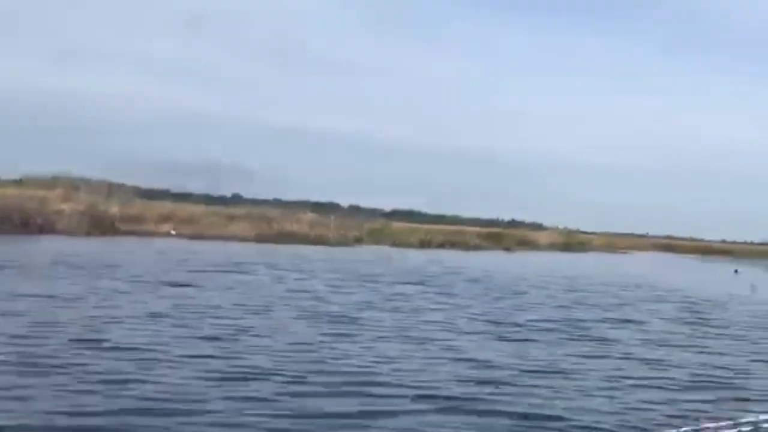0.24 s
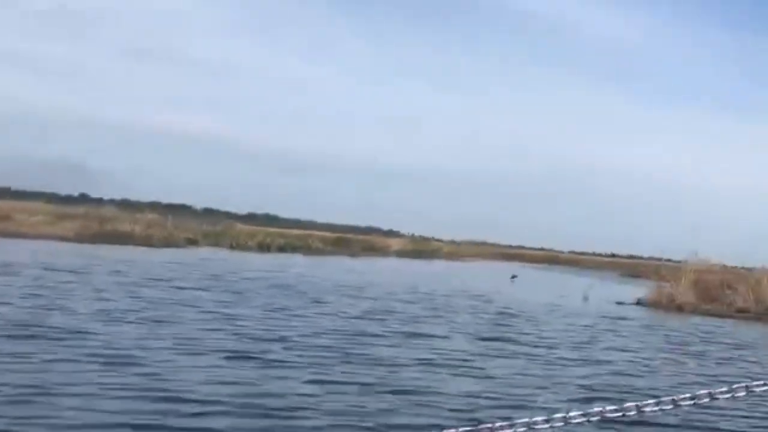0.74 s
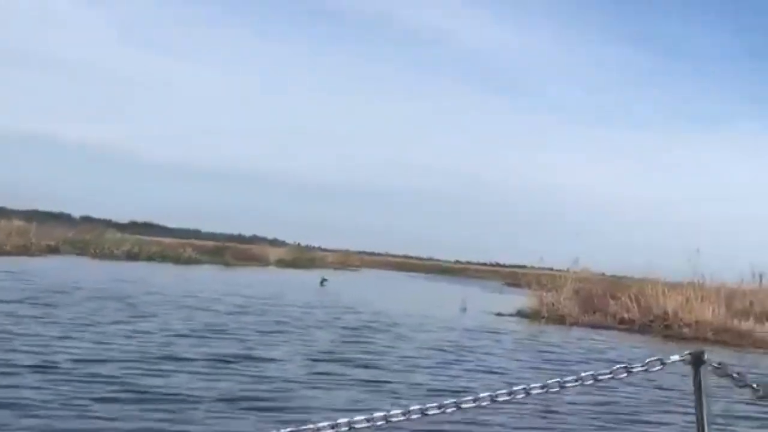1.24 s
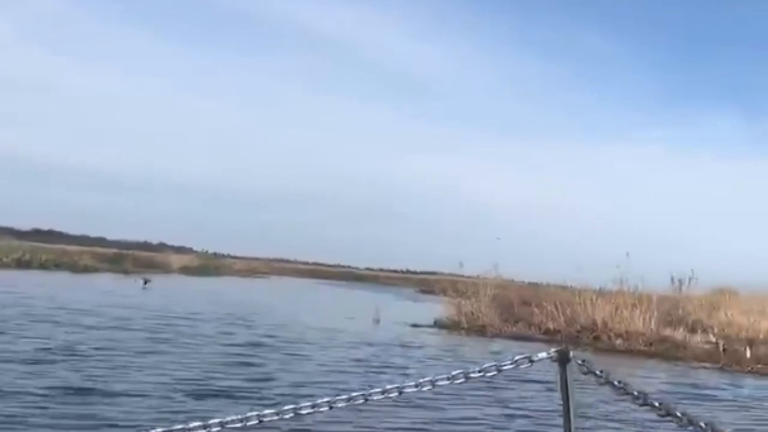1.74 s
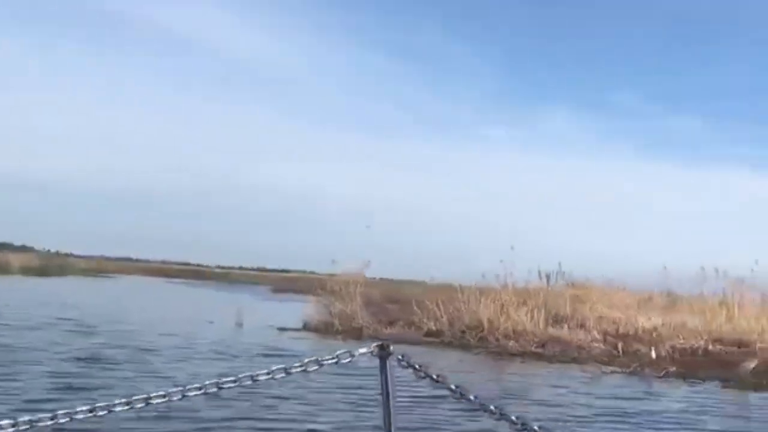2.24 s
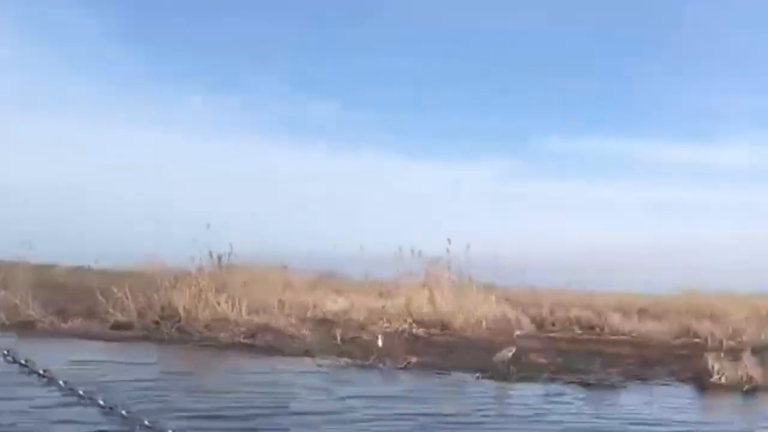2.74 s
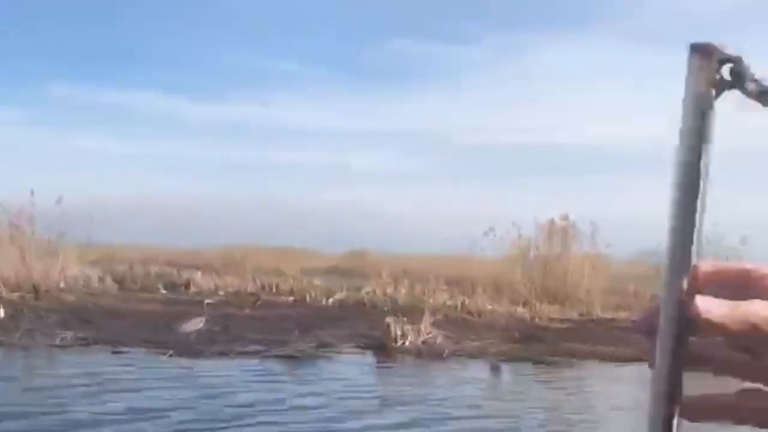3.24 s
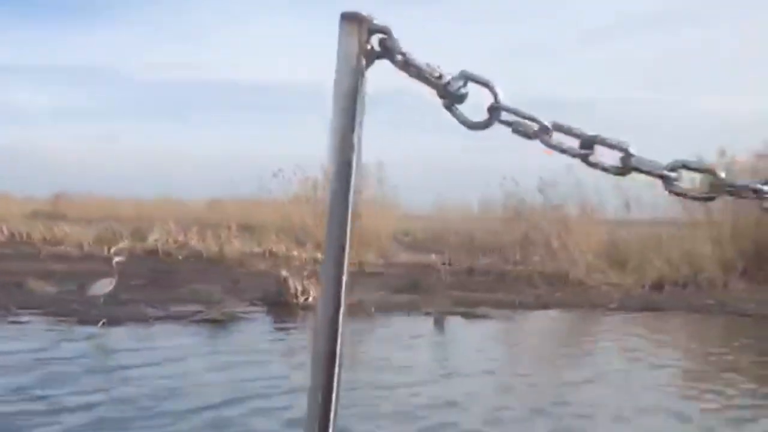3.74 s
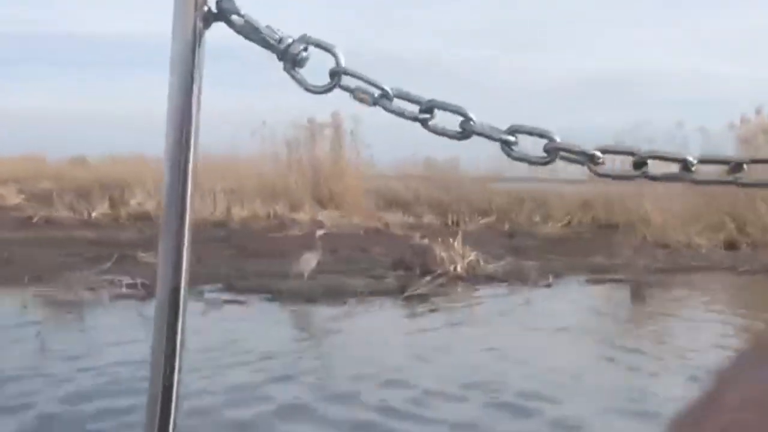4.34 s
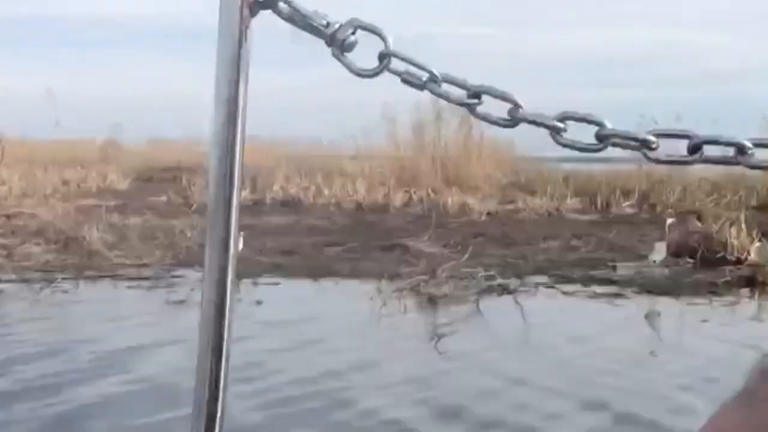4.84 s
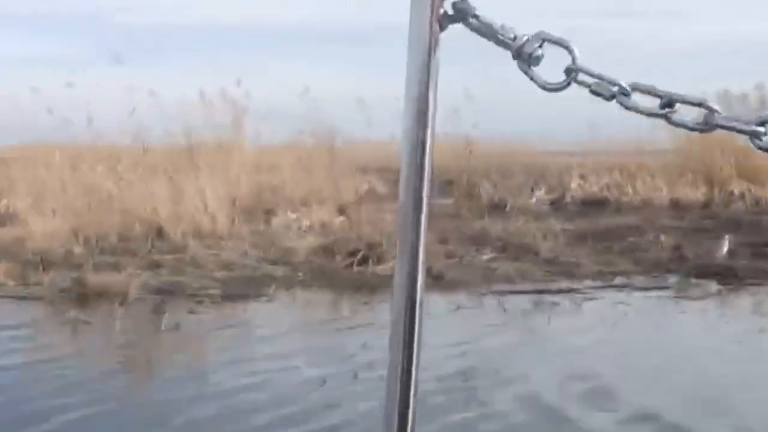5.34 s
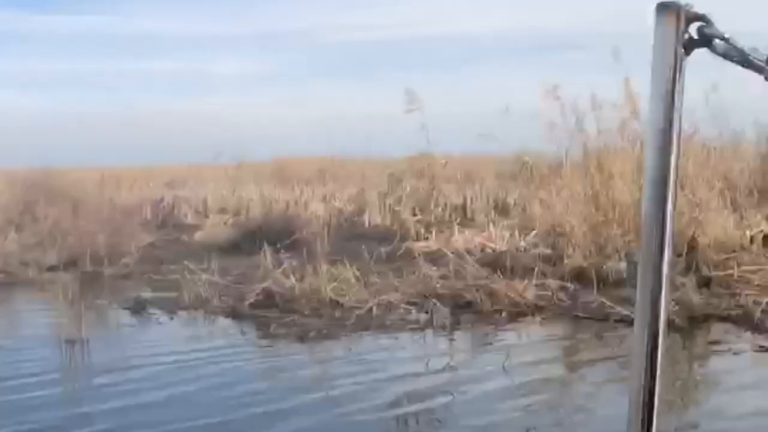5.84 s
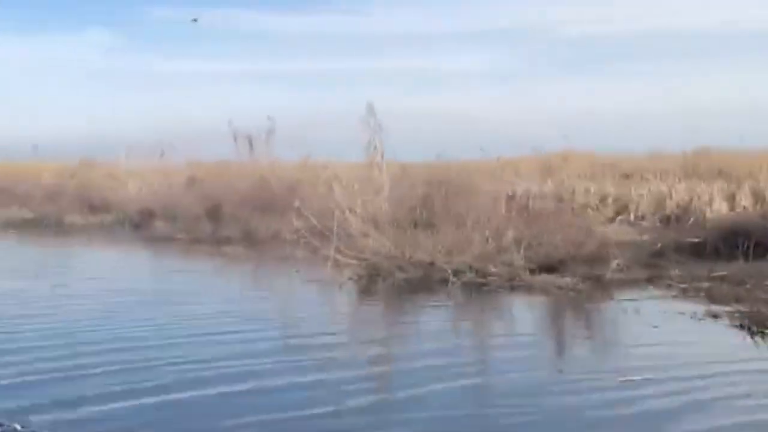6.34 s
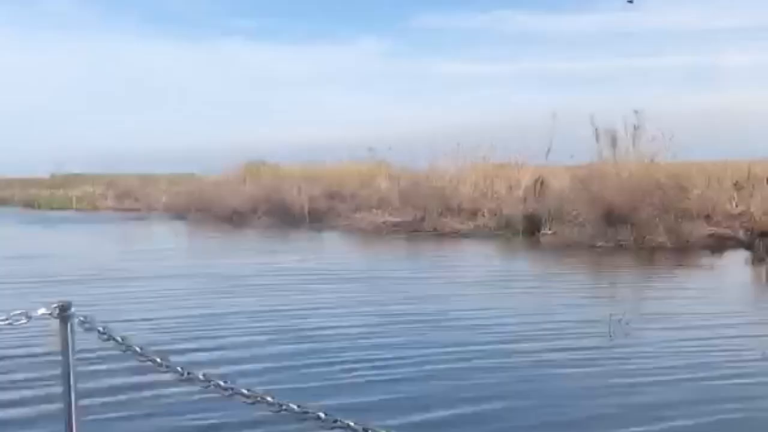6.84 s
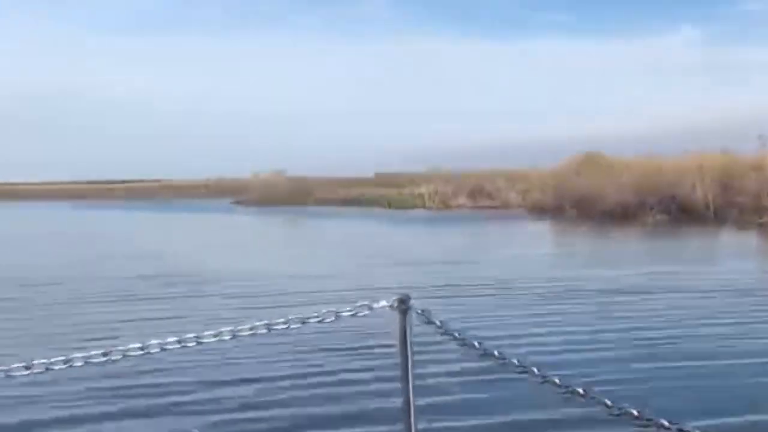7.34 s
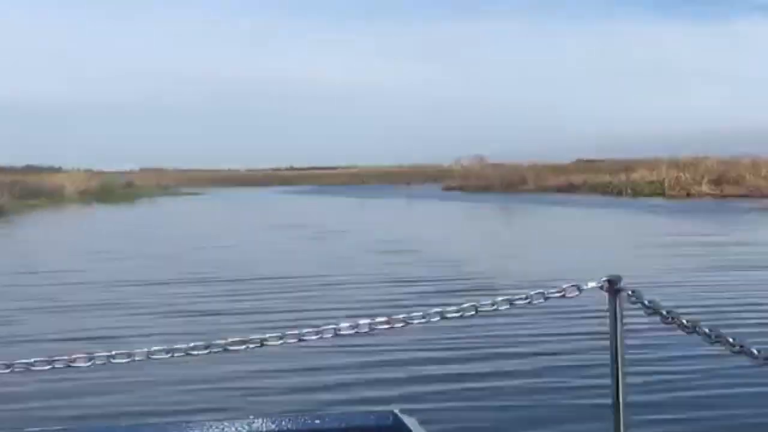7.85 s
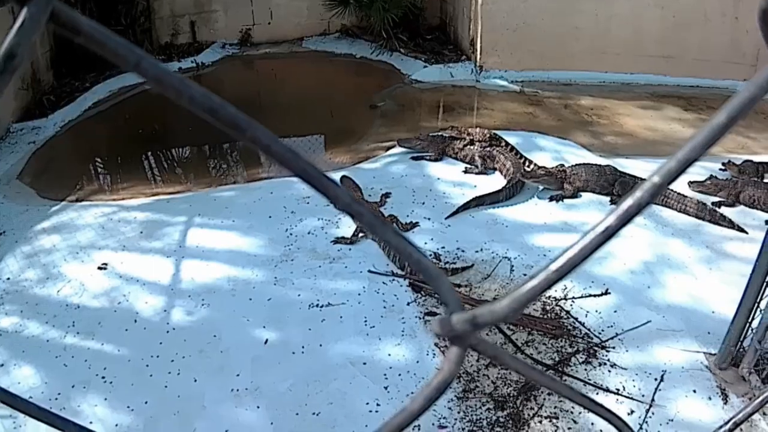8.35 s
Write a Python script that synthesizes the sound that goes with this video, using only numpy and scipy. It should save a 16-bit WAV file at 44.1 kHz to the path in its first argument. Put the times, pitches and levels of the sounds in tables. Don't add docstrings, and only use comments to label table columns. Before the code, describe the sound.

Deep steady drone of a boat's big caged air propeller and engine, rushing air and gusty thumps, slowing late before an abrupt silence.

```python
import sys
import numpy as np
from scipy import signal
from scipy.fft import rfft, irfft, next_fast_len
from scipy.io import wavfile
from scipy.ndimage import uniform_filter1d

SR = 44100
rng = np.random.default_rng(int(sys.argv[2]) if len(sys.argv) > 2 else 0)


def gain_from_db(level_db):
    decades = np.asarray(level_db, float) / 20
    return 10 ** decades


def digitize_waveform(pressure):
    field = np.atleast_2d(pressure).T
    bounded = np.clip(field, -1, 1)
    quanta = np.round(bounded * 32767).astype(np.int16)
    wavfile.write(sys.argv[1], SR, quanta)


N = 379695

# [t/s, blade rate f/Hz, throb level/dB, hull drumming on 4th harmonic level/dB]
PROPELLER = [(0.0, 86.55, -9.5, -17.5), (0.5, 85.8, -11, -19), (1.25, 85.36, -9, -21),
             (1.6, 83.94, -10, -20.5), (2.0, 83.6, -10, -27), (2.25, 83.1, -12.5, -25.5),
             (2.7, 82.3, -13, -29.5), (3.1, 81.66, -13.5, -24), (3.6, 82.0, -13.5, -23),
             (4.5, 81.5, -14.3, -22), (5.3, 81.26, -15, -22.5), (6.2, 81.47, -15.5, -27),
             (6.55, 80.2, -15, -26.5), (6.875, 76.24, -17, -35), (7.05, 72.88, -24.5, -37.5),
             (7.3, 71.2, -35, -30.5), (7.6, 69.8, -23, -29), (8.2, 69.77, -28, -32.5)]
# [f/Hz, level/dB re other harmonics]
HULL_CAGE_RESPONSE = [(210, -0.5), (250, -1.5), (350, -3), (415, -4), (490, -10.5), (580, -9), (603, -6),
                      (655, -13.5), (700, -9.5), (745, -12.5), (830, -9), (940, -11.5), (1010, -17.5),
                      (1600, -22)]
# [t/s, harmonics behind fundamental lag/cycles, exhaust note behind 2nd harmonic lag/cycles]
TURNING_LAG = [(0, .08, -.05), (1.5, .15, -.05), (2.8, .42, -.12), (6.2, .38, 0.), (7.0, .4, .35),
               (8.2, .42, .42)]
# [half-order of crank/1, level/dB]
HALF_ORDER_LEVELS = [(2, -34), (4, -41.5), (6, -33.5), (7, -41), (9, -49), (10, -40.5), (12, -46.5),
                     (15, -48), (18, -40.5)]
# [blade rate f/Hz, 2nd harmonic level/dB, other harmonics level/dB,
# 3rd half-order level/dB, 5th half-order level/dB, tooth tone level/dB, its octave level/dB]
SHAFT_SPEED_LAW = [(69.6, -22, -29, -36, -18.5, -54, -48.5), (72.2, -28, -31.5, -26.5, -19.5, -50, -51),
                   (75.8, -27, -34, -31, -28, -47.5, -58), (79.91, -24, -28, -26, -38, -47, -55),
                   (82, -30.5, -30, -26.5, -32.5, -40.5, -56), (83.5, -23.5, -28, -33, -22.5, -44.5, -53.5),
                   (86, -29, -26.5, -27.5, -32, -43.5, -57)]
# [t/s, rise level/dB, length t/s]
TOOTH_SINGS = [(.78, 1.5, 0.099), (1.3, 2, 0.11), (1.84, 11.5, 0.21), (2.47, 8, 0.084), (2.97, 11, .2),
               (3.38, 5, .1), (3.85, 3, .15), (4.29, 2, .08), (4.68, 3, 0.079), (5.0, -12, .1),
               (5.33, -10, .1), (5.59, 3, 0.069), (5.95, 7, .15), (6.25, 8.5, .12), (6.47, 8.5, 0.058),
               (6.72, -10, 0.079), (6.88, 10.5, 0.1)]
# [t/s, rise level/dB, length t/s]
TOOTH_OCTAVE_SINGS = [(.6, 5, .12), (1.5, 5, .12), (2.08, 8, 0.099), (6.9, 4, .07), (7.33, 5.5, .15),
                      (8.17, 9.5, .08)]
STAGE_TIMES_S = [.5, 2, 4.5, 7.7]
# [f/Hz, density level/dB per Hz]
AIR_SPECTRUM = [(40, -14), (60, -2.5), (110, -5), (200, -3.5), (350, -6.5), (550, -9.5), (900, -14),
                (1500, -21), (2500, -22.5), (3800, -26), (5600, -29.5), (7200, -30), (8500, -33),
                (12500, -40)]
# [t/s, slipstream level/dB, crosswind level/dB]
SEAT_WIND = [(0, -1, -1), (.8, 0, -2), (1.5, 0, -4), (2.4, -1, -5), (2.9, 0, -2), (3.3, 2, 2.5),
             (4.0, 3, 3.5), (4.6, 4, 3), (5.0, 2.5, 2.5), (5.5, 2.5, 5), (6.2, 1.5, 4), (6.65, 0, 3.5),
             (6.95, -2, -1.5), (7.5, -1.5, -1.5), (8.2, -0.5, -2)]
# [slipstream/dB per dB, crosswind/dB per dB, blade rate/dB per Hz,
# gust share/1, opening surge share/1]
AIR_SWELL_LAW = [(-1.5, .1, 0.37, 0.74, .3), (0.24, 0.81, .02, .2, 0.031), (-0.77, 0.32, .3, .1, 1.5),
                 (1.2, .05, 0.07, .05, 0.7), (0.8, .02, 0.12, .02, -.1), (0.74, .02, 0.05, .02, 0.12)]
# [t/s, rise level/dB, length t/s]
MIC_GUSTS = [
    (.4, 5, 0.084),
    (1.8, 7, 0.079),
    (2.4, -6, 0.098),
    (4.4, 6, .1),
    (5.2, 10, .2),
    (6.75, 4.5, .2),
    (7.35, 11, 0.11),
    (8.0, 9, 0.11),
]
# [t/s, peak level/dB, f/Hz]
HULL_KNOCKS = [
    (0.262, -19.5, 1930),
    (7.239, -13, 586),
]

CRANK_TEETH, PROP_TEETH, BLADES = 48, 110, 3
AIR_RMS_DB, CRUISE_BLADE_HZ, CUT_S = -21, 82, 8.2035


def time_s():
    return np.arange(N) / SR


def curves(table):
    knot_s, *columns = np.transpose(table)
    return [np.interp(time_s(), knot_s, column) for column in columns]


def by_speed(blade_hz):
    knot_hz, *columns = np.transpose(SHAFT_SPEED_LAW)
    return [np.interp(blade_hz, knot_hz, column) for column in columns]


def staged(db):
    return np.interp(time_s(), STAGE_TIMES_S, db)


def humps(rows):
    t = time_s()
    return sum(db * np.exp(-((t - s) / length_s) ** 2) for s, db, length_s in rows)


def walk(rate_hz):
    coarse = np.repeat(rng.standard_normal(int(N / SR * rate_hz) + 2), 8)
    coarse = 1.42 * uniform_filter1d(uniform_filter1d(coarse, size=8), size=8)
    return np.interp(np.arange(N) * 8 * rate_hz / SR, np.arange(len(coarse)), coarse)


def tone(cycles, rms_db, sway_db=0., sway_cycles=0., rate_hz=2.93):
    level = np.sqrt(2) * gain_from_db(rms_db + sway_db * walk(rate_hz))
    return level * np.cos(2 * np.pi * (cycles + sway_cycles * walk(rate_hz)))


def propeller(turn, blade_hz, first_db, second_db, fourth_db, rest_db, strut_db, lag):
    out = tone(turn, first_db, sway_db=0.55, sway_cycles=.012, rate_hz=10)
    out = out + tone(2 * turn - lag, second_db, sway_db=0.7, sway_cycles=0.014, rate_hz=6)
    out = out + tone(4 * turn - lag, fourth_db, sway_db=1.58, sway_cycles=0.0083, rate_hz=18)
    response_hz, response_db = np.transpose(HULL_CAGE_RESPONSE)
    for k in [3, *range(5, 20)]:
        spread = (k > 5) * 0.63 * (rng.random() - .5)
        db = rest_db + np.interp(k * blade_hz, response_hz, response_db)
        if k % 5 == 0:
            db = db + strut_db
        out = out + tone(k * turn - lag + spread, db, sway_db=1.5, sway_cycles=0.0042 * k, rate_hz=6)
    return out


def engine(cycle, lag, third_db, fifth_db):
    out = tone(3 * cycle + .5, third_db, sway_db=0.9)
    out = out + tone(5 * cycle - lag, fifth_db, sway_db=2.06)
    load_db = .6 * (third_db + 26.5)
    for k, db in HALF_ORDER_LEVELS:
        phase = k * cycle + rng.random()
        out = out + tone(phase, db + load_db, sway_db=1.0, sway_cycles=0.035, rate_hz=1.5)
    return out


def gear(cycle, mesh_db, octave_db):
    teeth = 2 * CRANK_TEETH * cycle
    out = tone(teeth, mesh_db, sway_db=1.05, sway_cycles=0.043, rate_hz=33)
    side_db = staged([-49, -47.5, -44.5, -51.5])
    for side in (-1, 1):
        out = out + tone(teeth + 2 * side * cycle, side_db, sway_db=3.0, sway_cycles=0.38, rate_hz=90)
    out = out + tone(2 * teeth, octave_db, sway_db=1.3, sway_cycles=0.1, rate_hz=70)
    return out + tone(2 * teeth, -47.0, sway_db=3, sway_cycles=0.67, rate_hz=400)


def air(turn, swells_db):
    swells_db = [swell - swell.mean() for swell in swells_db]
    log_anchors = np.log([40, 300, 900, 2000, 4200, 9000])  # Hz, one a swell
    size = next_fast_len(N)
    hz = np.arange(1, size // 2 + 2) * SR / size
    spectrum_hz, spectrum_db = np.transpose(AIR_SPECTRUM)
    shape = gain_from_db(np.interp(np.log(hz), np.log(spectrum_hz), spectrum_db))
    noise = shape * np.minimum(hz / 40, 1) * rfft(rng.standard_normal(size))
    gust = walk(36)
    chop = np.cos(2 * np.pi * (turn - .33)) * np.clip(swells_db[-1] + 2.5, 0, 9) / 5
    out = 0
    for step in range(21):
        centre_hz = 20 * 2 ** (step / 2)
        share = np.clip(1 - 2 * abs(np.log2(hz / centre_hz)), 0, 1)
        place = np.interp(np.log(centre_hz), log_anchors, np.arange(6))
        low = min(int(place), 4)
        db = swells_db[low] + (place - low) * (swells_db[low + 1] - swells_db[low])
        bass = np.clip(1 - place / 5.4, .25, 1)
        db = db + bass * (1.7 * gust + 2.45 * walk(20))
        db = db + 1.3 * chop * np.clip(place - 3.3, 0, 2) / 1.6
        out = out + gain_from_db(db) * irfft(noise * share, size)[:N]
    return out * gain_from_db(AIR_RMS_DB) / out.std()


def blade_tips(turn, tips_db):
    high_pass = signal.butter(3, 14800, "high", fs=SR, output="sos")
    hiss = signal.sosfilt(high_pass, rng.standard_normal(N))
    puff_db = 2.3 * np.cos(2 * np.pi * (turn - .35)) + 2.3 * walk(200) + .5 * walk(18)
    return gain_from_db(tips_db + puff_db + 5.0) * hiss / hiss.std()


def knocks():
    out, t = np.zeros(N), np.arange(1000) / SR
    envelope = t / 0.003 * np.exp(-t / .0025)
    for s, db, hz in HULL_KNOCKS:
        rough = 1 + hz / 300 * uniform_filter1d(rng.standard_normal(len(t)), size=16)
        ring = np.sin(2 * np.pi * 1.25 * hz * t * (1 - 25 * t)) * rough
        start = int(s * SR)
        out[start:start + len(t)] += gain_from_db(db + 5.5) * ring * envelope
    return out


def whistle():
    t = time_s()
    db = np.interp(t, [7.2, 7.5, 8.2], [-70, -54, -54])
    return tone(7020 * t, db, sway_db=2.5, sway_cycles=.5, rate_hz=260)


def scene():
    blade_hz, throb_db, drum_db = curves(PROPELLER)
    second_db, rest_db, third_db, fifth_db, mesh_db, octave_db = by_speed(blade_hz)
    turn = np.cumsum(blade_hz) / SR
    cycle = turn * PROP_TEETH / CRANK_TEETH / BLADES / 2
    lag, exhaust_lag = curves(TURNING_LAG)
    wash_db, cross_db = curves(SEAT_WIND)
    faster_hz = blade_hz - CRUISE_BLADE_HZ

    second_db = second_db + 0.55 * wash_db
    rest_db = rest_db + .5 * wash_db
    strut_db = 0.96 * wash_db
    tips_db = -47 + 1.9 * wash_db + .08 * faster_hz
    gust_db = humps(MIC_GUSTS)
    surge_db = 5.5 * np.exp(-time_s() / .25)
    swells_db = [wash * wash_db + cross * cross_db + speed * faster_hz + gust * gust_db + surge * surge_db
                 for wash, cross, speed, gust, surge in AIR_SWELL_LAW]

    mix = propeller(turn, blade_hz, throb_db, second_db, drum_db, rest_db, strut_db, lag)
    mix = mix + engine(cycle, lag + exhaust_lag, third_db, fifth_db)
    mix = mix + gear(cycle, mesh_db + humps(TOOTH_SINGS), octave_db + humps(TOOTH_OCTAVE_SINGS))
    mix = mix + air(turn, swells_db) + blade_tips(turn, tips_db) + knocks() + whistle()
    return mix[None, :]


def top_cut(x):
    return signal.sosfilt(signal.butter(12, 17000, fs=SR, output="sos"), x)


def record(dry):
    soft = 2.187 * np.tanh(dry / 2.205)
    soft = signal.sosfilt(signal.ellip(14, .3, 100, 15720, fs=SR, output="sos"), soft)
    since_s = time_s() - CUT_S
    dull = signal.sosfilt(signal.butter(2, [250, 3000], "band", fs=SR, output="sos"), soft)
    smear = dull * gain_from_db(-34 - 1900 * np.maximum(since_s, 0))
    open_share = np.clip(-since_s / .0002, 0, 1)
    return top_cut(open_share * soft + (1 - open_share) * smear)


dry = scene()
out = record(dry)
digitize_waveform(out)
```